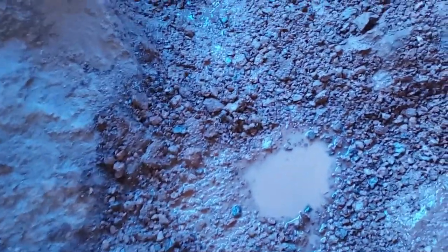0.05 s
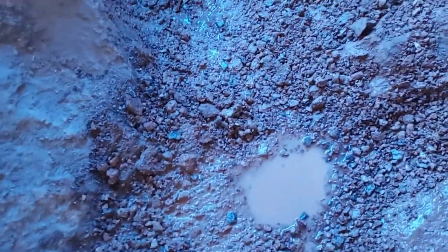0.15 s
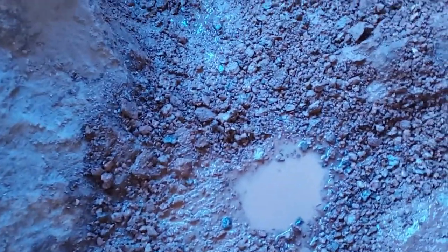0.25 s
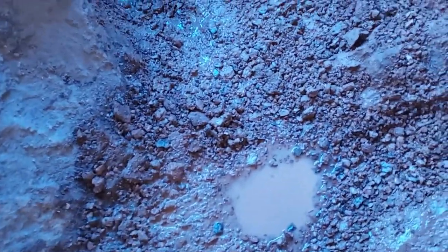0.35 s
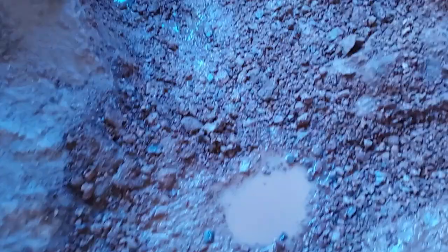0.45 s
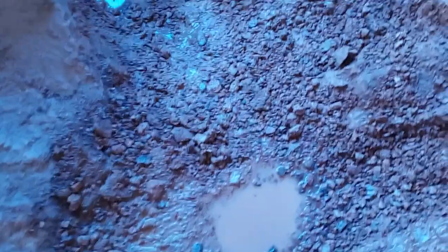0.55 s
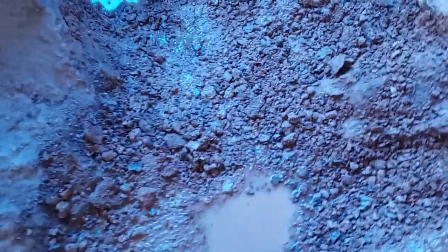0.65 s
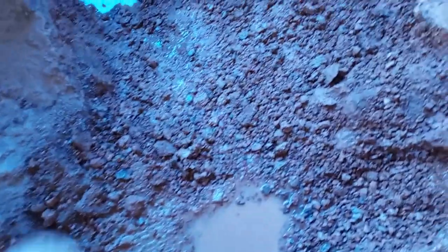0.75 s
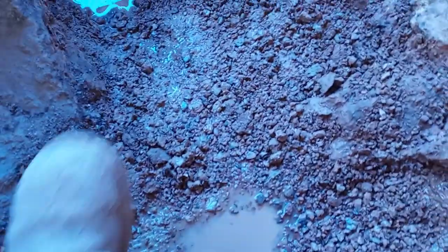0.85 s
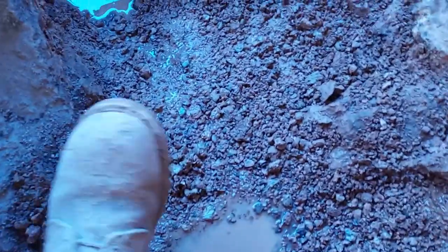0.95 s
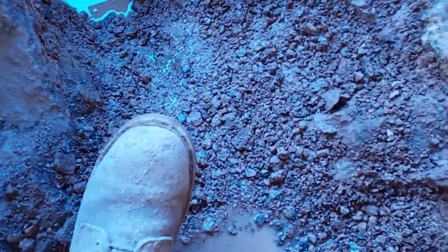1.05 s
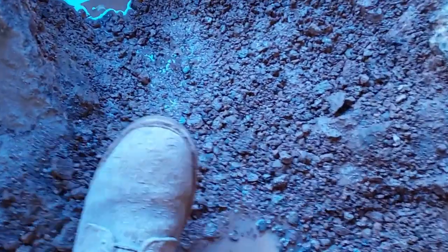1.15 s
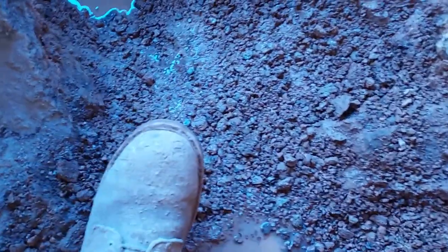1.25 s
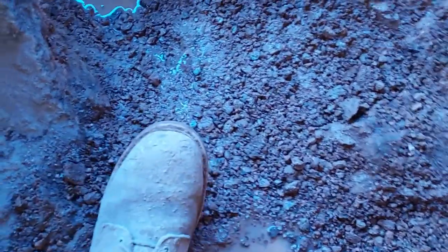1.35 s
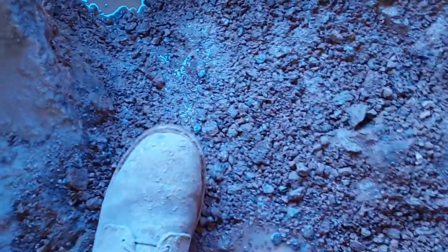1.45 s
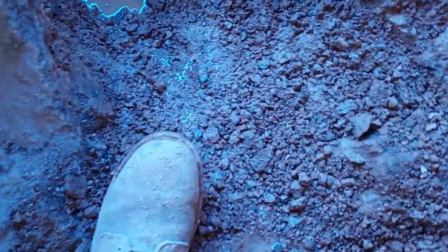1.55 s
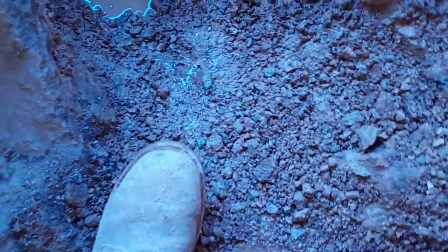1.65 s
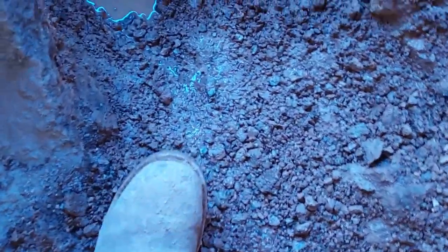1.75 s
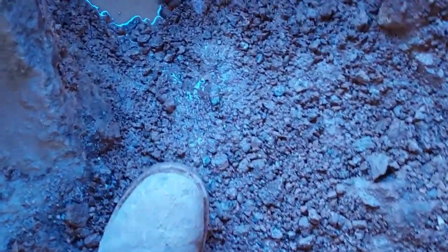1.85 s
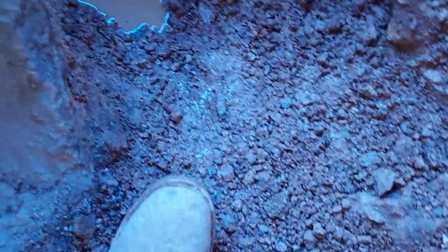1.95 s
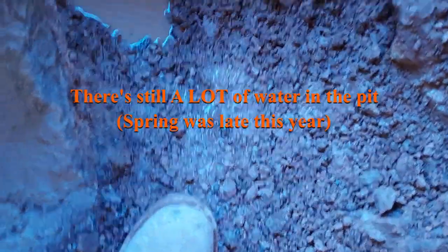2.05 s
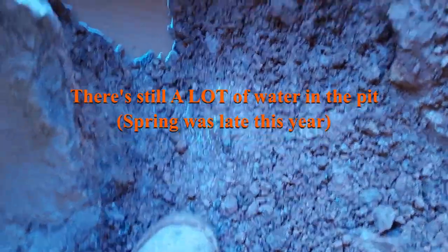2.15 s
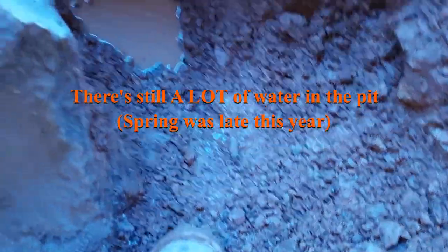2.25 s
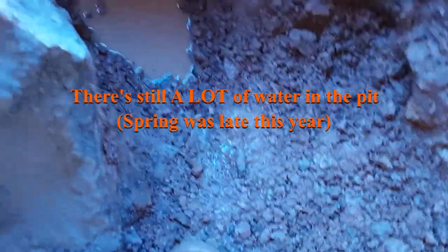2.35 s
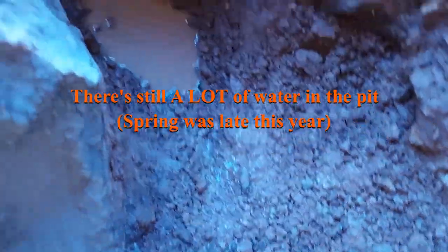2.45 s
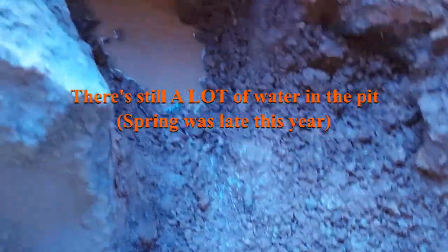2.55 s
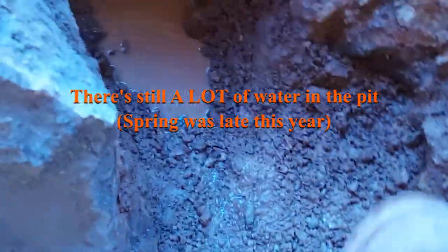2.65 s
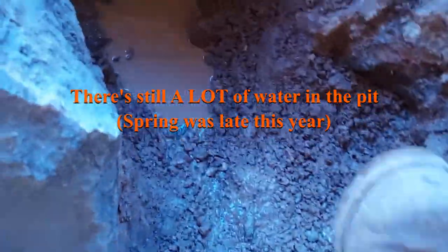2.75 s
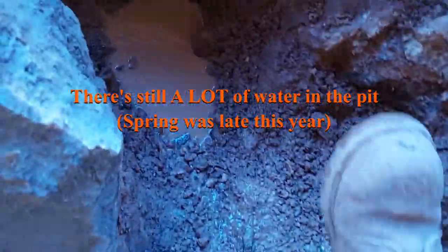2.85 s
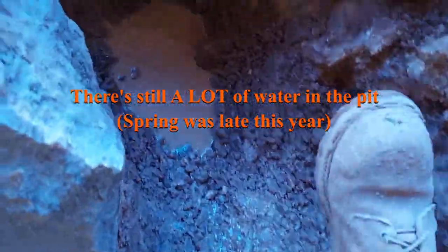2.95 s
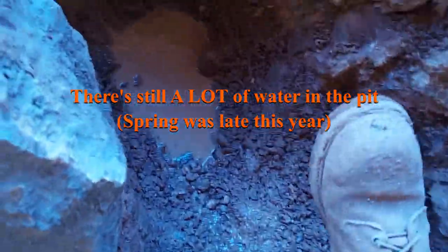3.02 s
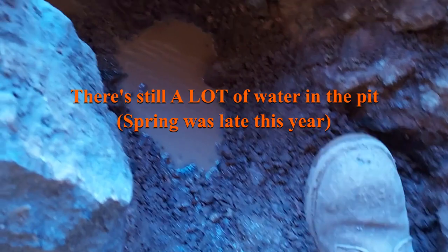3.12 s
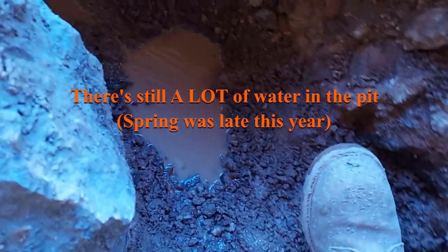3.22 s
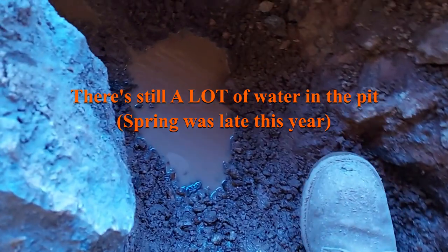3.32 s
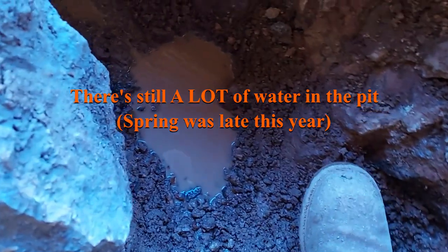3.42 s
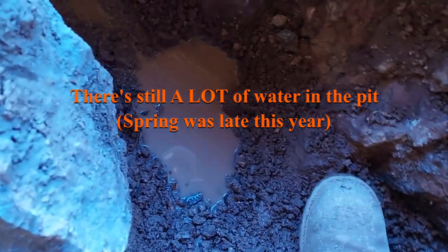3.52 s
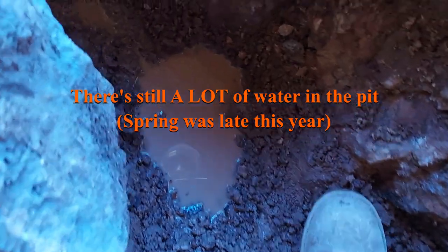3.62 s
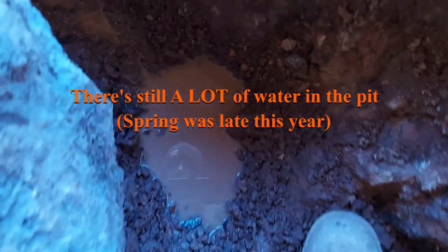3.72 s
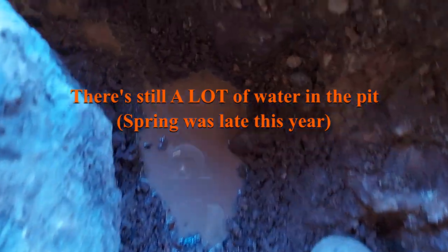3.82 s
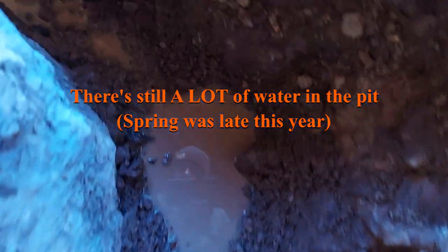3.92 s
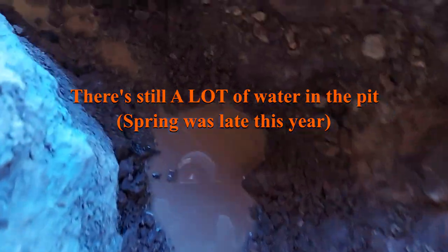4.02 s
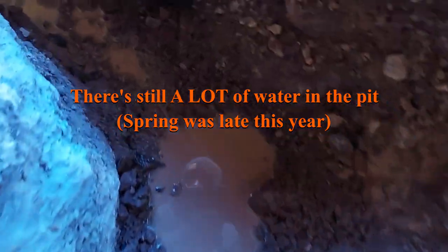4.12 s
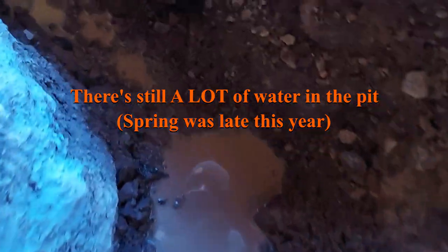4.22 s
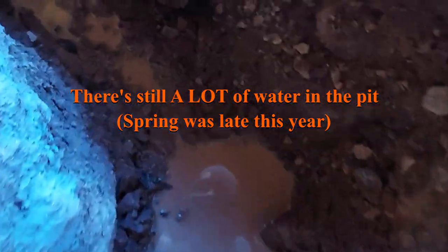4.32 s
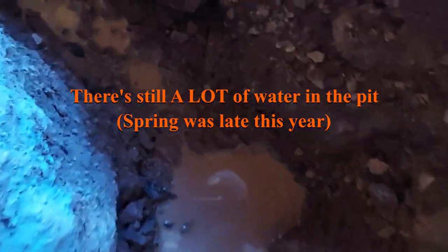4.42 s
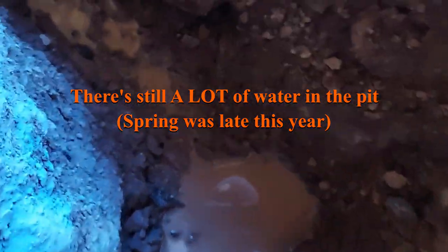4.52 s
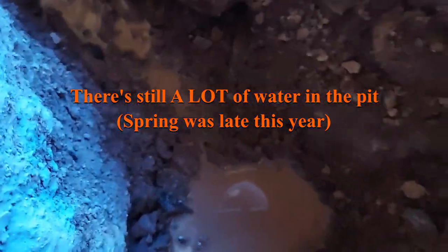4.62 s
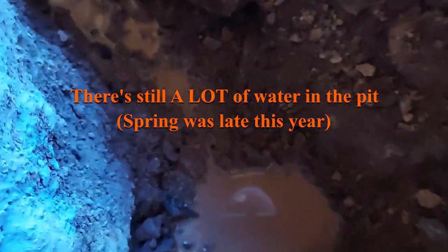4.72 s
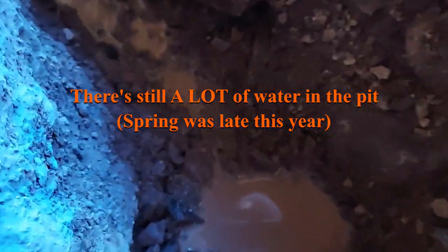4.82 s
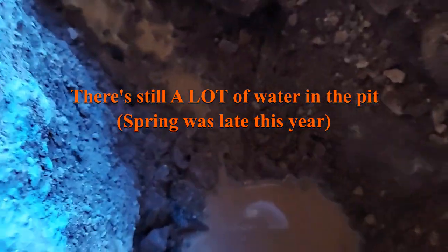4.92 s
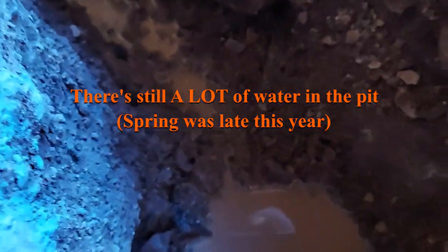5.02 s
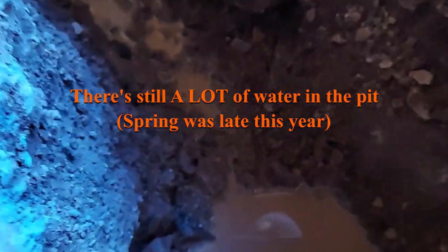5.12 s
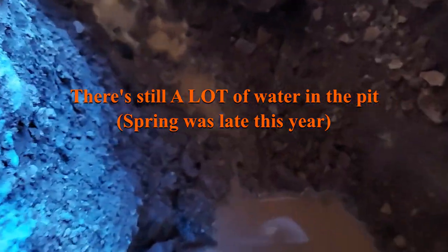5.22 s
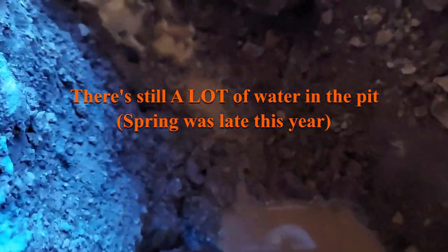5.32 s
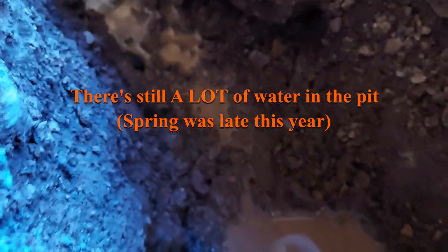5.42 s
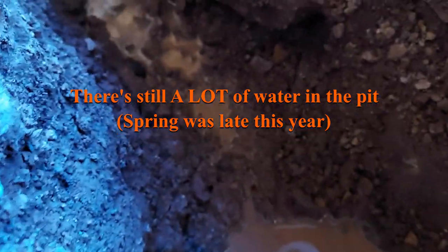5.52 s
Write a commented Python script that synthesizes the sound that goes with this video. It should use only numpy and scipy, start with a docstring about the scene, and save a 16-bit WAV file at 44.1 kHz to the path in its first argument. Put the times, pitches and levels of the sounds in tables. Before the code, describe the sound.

Boots crunch and shift on wet gravel in a narrow rock pit, with stones clacking sharply and a low boom beneath.

```python
"""A clack of stone and a crunch of wet gravel open the scene: boots shift at the bottom of a narrow rock pit.
Coarse, small and fine stones grind as dense damped rings over noise, and wet grit fizzes on top.
Single stones clack as pairs of short rings, grit bursts in bright puffs, and the close rock walls answer both.
Under it the ground thuds (low grains), the air of the pit booms and a faint air hiss stays (coloured noise).
All of it is heard through the two ports of a hand-held camera."""
import sys
import numpy as np
from scipy import signal
from scipy.fft import rfft, irfft, next_fast_len
from scipy.io import wavfile
from scipy.ndimage import uniform_filter1d, map_coordinates

SR = 44100
rng = np.random.default_rng(int(sys.argv[2]) if len(sys.argv) > 2 else 0)


def log_audio(samples):
    """Write samples as a 16-bit WAV file to the path given in sys.argv[1]."""
    # one column per channel
    frames = np.atleast_2d(samples).T
    # limit to full scale, then quantise
    limited = np.clip(frames, -1, 1)
    pcm = np.round(limited * 32767).astype(np.int16)
    wavfile.write(sys.argv[1], SR, pcm)


N = 245637

# The sole pressing into the gravel: start_s, hold_s, fall_s (time to die 20 dB, never under 0.02),
# small_db (small stones), then relative to small_db: coarse_db, fine_db, grit_db, thud_db
CRUNCH_EVENTS = [(0.021, 0, 0.11, -57, 2.5, -3, -3.5, 4.5), (0.26, 0.018, 0.3, -69.5, -1.5, 0, -4, 0),
                 (.372, 0, 0.42, -74.5, 9, 0, 0.5, 15), (0.535, 0.016, -0.07, -58, 5.5, -2, -24, 5),
                 (0.582, 0.0097, 0.1, -60, 2.5, 3.5, 4, 0.5), (0.776, 0.044, -0.05, -64, -3, -1, -3, 5),
                 (0.834, 0.062, -0.9, -70, 3.5, 0, -17, 9), (0.885, 0, 0.2, -73, -13, -1, 4, 10),
                 (1.062, 0.016, -0.05, -59, 5, 4, -1, 8), (1.125, 0.046, 0.05, -57, 2.5, 0.5, -2.5, 7),
                 (1.174, 0.064, 0.12, -51, -6.5, -10, -11, 2), (1.293, 0, 0.2, -60.5, -8, -1.5, -2.5, 1.5),
                 (1.509, 0.13, -0.8, -58, -7.5, -2, -4, -9.5), (1.663, 0, 0.13, -55, 2.5, -2, -2, -3),
                 (1.732, 0.082, 0.43, -66.5, 4, 1.5, -1, -18),
                 (2.007, 0.013, 0.09, -61.5, 4.5, -2.5, -4, 5),
                 (2.301, 0.077, -1.1, -68, 7.5, -6, -1.5, 8.5), (2.772, 0.019, 0.16, -57, 4.5, -5, 2, 1),
                 (2.938, 0, 0.5, -59, 0.5, -5.5, -7, 1), (3.26, 0.0007, 0.09, -53, 4, -7.5, -8.5, 1),
                 (3.358, 0.0042, 2.5, -63.5, 2, -19, -16, 1), (3.443, 0.083, 0.01, -52.5, -2, -5, -6, -20),
                 (3.597, 0.065, -0.15, -48.5, 3, -4.5, -4.5, -1.5),
                 (3.83, 0.058, -0.0573, -44, -6.5, -5, -7.5, -2.5),
                 (4.016, 0.016, 0.04, -49, 5.5, -6.5, -8, 6), (4.157, 0.031, 0.1046, -55, 0, -2.5, -8, 4),
                 (4.311, 0.0085, -0.4, -62, -1.5, -9, -20, 3.5), (4.5, 0.15, 0.5, -66, 4, -0.5, -3, 4.5),
                 (4.713, 0.076, -1.54, -64.5, -10, 0, 0, -5),
                 (5.138, 0.033, -0.1, -63.5, 0, -5.5, -10, 6.5), (5.35, 0, 0.23, -73.5, 4.5, -4, -14, 13.5)]
RISE_S = 0.057  # a crunch grows 20 dB in this time
# The boots shuffling between the crunches: time_s, small_db (small stones)
SHUFFLE_LEVEL = [(0, -79), (.3, -77.5), (1, -76.5), (1.45, -71), (1.9, -73.5), (2.15, -69), (2.45, -62.5),
                 (2.72, -61), (3.1, -68), (3.35, -65), (3.72, -52.5), (3.96, -51), (4.12, -58.5),
                 (4.4, -69.5), (4.95, -69), (5.35, -74), (5.57, -97)]
# Shuffle layers relative to that curve: one level_db each for small, coarse, fine, grit, thud
SHUFFLE_BALANCE_DB = [-1, -2.5, -4.5, -4.5, -3.5]

# Colour of each gravel layer: freq_hz, relative_db
COARSE_COLOUR = [(250, -4), (480, -3.5), (700, -8.5), (1050, -5), (1350, -5.5), (2200, -41)]
SMALL_COLOUR = [(1000, -3), (1450, -3.5), (1700, -0.5), (2100, -3), (2800, -6), (3200, -8.5), (4200, -35)]
FINE_COLOUR = [(2500, -8), (3300, -0.5), (4200, 0.5), (5100, 0), (6000, -2.5), (7500, -26)]
GRIT_COLOUR = [(5000, -8), (6500, 2.5), (8500, -1), (11000, 3), (14800, 2.5), (16000, 1.5)]
# Modes of the pit that ring in the grinding: freq_hz, width_hz, gain_db
PIT_MODES = [(684, 42, -2), (1011, 33, -5.5), (1680, 41, -1.5), (2740, 55, -8.5), (3710, 40, -16),
             (5060, 146, -9)]

# Two stones knocking: start_s, level_db (before a common trim), pitch_hz, other_pitch_hz,
# other_db (relative), ring_ms (to fall to 1/e), chip_db and knock_db (relative, before a boost), left_right_db
CLACK_EVENTS = [(0.024, -38.5, 705, 2020, -3.5, 3.5, -26, -10, 14),
                (.036, -46, 710, 1910, 2, 3.5, -24, -8, 20), (0.085, -34, 1060, 1900, -8, 1.8, -39, -23, 2),
                (0.359, -37, 690, 2220, -11, 4.3, -18, -0.5, 9),
                (0.4949, -45.5, 720, 960, -2, 5.1, -30, 4, 4), (0.524, -46.5, 745, 410, 4, 7, -5.5, -17, 7),
                (0.54, -36.5, 694, 1030, -5.5, 5.3, -9, -3, 6),
                (0.804, -37.5, 900, 760, -7, 3.1, -3.5, -19, 2.5),
                (0.831, -40, 990, 1510, -12, 2.9, -12, -27, 3),
                (1.038, -25.5, 990, 2706, 1, 5.4, -2, -7, 6.5),
                (1.0397, -32.5, 497, 1690, -10, 6.7, -6, -10, 7),
                (1.131, -39.5, 2960, 3800, 1, 2.8, -8, -12, 3),
                (1.152, -39, 2850, 6530, -11, 4.6, -9, -2, 14),
                (1.172, -38, 290, 470, -4, 9.7, -40, -16, 5),
                (1.205, -35.5, 247, 520, -2, 5.6, -40, -17, 6),
                (1.577, -39, 1230, 2430, 1, 2.4, -17, -16, 12.5),
                (1.66, -42.5, 1460, 3470, -7, 4.6, -7, -18.5, 5),
                (1.703, -40, 600, 990, -10, 3.4, -23, -2, 13), (2.021, -46, 613, 1050, -12, 3.5, -7, 7, 6),
                (2.222, -35, 1115, 2210, -3.5, 3.5, -21, -8, 8.5),
                (2.3, -35, 1280, 2280, -6, 2.7, -26, -11, 11), (2.308, -46, 1300, 2310, 0, 2.3, -20, 3, 11),
                (2.3445, -33.5, 1460, 810, -4.5, 2, -26, -9, 10),
                (2.47, -34, 1280, 1880, -3.5, 2.9, -42, -31, 15),
                (2.5166, -26.5, 1150, 2200, -7, 2.27, -20.5, -23, 10.5),
                (2.576, -42.5, 2150, 3200, -7, 4.1, -3.5, -34.5, 10),
                (2.705, -41, 640, 1120, -6, 3.1, -13.5, -19.5, 15),
                (2.745, -38.5, 1140, 1740, 1.5, 3.8, -30, -1, 2),
                (2.776, -36.5, 545, 900, -22, 4.9, -42, -33, 8),
                (2.917, -35, 1030, 1680, -4, 3.1, -21, -8, 12),
                (3.061, -41.5, 1060, 1980, 0.5, 2.7, -3, -23, 13),
                (3.244, -32, 698, 1530, 1.5, 4, -14, -2, 4.5),
                (3.5355, -25, 1830, 690, -6.5, 3.9, -23, -31, 12),
                (3.579, -37, 1140, 594, 2, 4, -12, -18, 9),
                (3.608, -34.5, 670, 3150, -4.5, 4.3, -19, -21, 14),
                (3.623, -33, 825, 1150, 4, 2.4, -19, -1, 1), (3.637, -44, 4950, 2640, 3, 4.6, -23, -25, 12),
                (3.652, -36.5, 640, 2640, 4, 5, -14, -20, 8),
                (3.663, -37.5, 4920, 3430, -3, 3.6, -25, -25, 8),
                (3.817, -43.5, 2480, 3430, 2, 4.9, 0.5, -25, 8),
                (3.868, -26, 1690, 2410, -21, 5.1, -21, -6, 9.5),
                (3.995, -31, 210, 297, -8, 6.6, -45, -13, 1),
                (4.008, -31.5, 350, 1125, -8.5, 12, -32, -13, 2),
                (4.036, -30.5, 960, 1780, 1, 3, -16, -13, 11),
                (4.149, -26, 640, 1270, -4, 2.85, -26, -21, 14.5),
                (4.187, -43.5, 1810, 5150, 0, 4.2, -1, -23, 11),
                (4.536, -32, 840, 1820, -10, 3, -21, -7.5, 8.5),
                (4.597, -35.5, 966, 720, -5, 6.6, -13, -5, 5),
                (4.716, -37, 935, 714, -13, 5.9, -32, -16, 7),
                (4.755, -40.5, 756, 1060, -3, 4.2, -34, -10, 5),
                (5.348, -42.5, 745, 470, 2, 3.8, -40, 0, 12)]
# Modes of one stone: pitch_ratio, level_db
STONE_MODES = [(1, -0.5), (1.319, -12.5)]
# The edges that touch ring high, whatever the stone's size: freq_hz, relative_db
CHIP_MODES = [(1600, -8), (1950, -8.5), (2300, -3.5), (2600, -8), (2950, -2), (3300, -2), (3750, -6.5),
              (4250, -10.5), (4800, -13.5), (5500, -11)]
CONTACT_CYCLES = 0.42  # a stone takes about this much of its period to be set ringing

# Grains of grit bursting: start_s, level_db (before a common trim)
CRACK_EVENTS = [(0.243, -53), (0.2567, -51), (0.3589, -47.5), (0.524, -48), (0.582, -37), (.6, -35),
                (0.77, -47), (0.874, -46), (0.883, -47), (1.038, -26), (1.107, -49), (1.1138, -39.5),
                (1.1458, -37), (2.704, -40.5), (2.7417, -47), (2.784, -45), (3.0534, -40), (3.06, -35),
                (3.245, -45.5), (3.5365, -41), (3.5623, -39), (3.6077, -35), (3.8162, -38), (3.87, -34),
                (4.142, -36.5), (4.187, -40), (4.582, -46.5), (4.6685, -47), (4.776, -54)]
CRACK_LEFT_DB = 7  # left over right

# Colour of the loaded ground: freq_hz, relative_db
THUD_COLOUR = [(120, -77), (190, -1.5), (300, -4), (480, -7), (800, -22)]
# Colour of the booming air of the pit: freq_hz, relative_db
BOOM_COLOUR = [(30, -20.5), (73, -3), (102, 4), (124, 4.5), (167, -9.5), (220, -13), (290, -13),
               (480, -120)]
# Swells of the boom: time_s, level_db
BOOM_SWELLS = [(0.0, -69.5), (0.22, -53.5), (0.29, -76), (0.37, -56), (0.46, -66), (0.6, -55), (0.7, -67.5),
               (0.76, -58.5), (0.99, -68), (1.05, -51.5), (1.12, -60), (1.19, -47), (1.5, -65),
               (1.64, -54.5), (1.89, -69.5), (2.02, -57.5), (2.17, -65.5), (2.42, -49.5), (2.59, -59),
               (2.78, -51), (2.82, -59), (2.87, -50.5), (3.5, -58), (3.65, -43), (3.72, -51.5),
               (4.0, -40.5), (4.06, -51.5), (4.42, -56.5), (4.48, -47.5), (4.89, -52.5), (4.92, -60),
               (5.1, -56), (5.18, -48.5), (5.27, -55.5), (5.37, -49.5), (5.57, -53)]
# How long the rock walls ring: freq_hz, t60_s
WALL_DECAY = [(150, 0.083), (1000, 0.25), (4000, 0.12), (12000, 0.007)]
# Colour of the still air and hiss: freq_hz, relative_db
AIR_COLOUR = [(100, -56), (300, -25), (900, -23), (2000, -35), (4400, -10), (9000, -14), (16000, -15)]

# Likeness of the two ports: freq_hz, correlation (0 to 1)
PORT_LIKENESS = [(60, 0.98), (130, 0.83), (290, 0.87), (640, 0.27), (1100, 0.096), (1800, 0.19),
                 (4500, 0.014), (8000, 0.92), (15000, 1)]
# The left port is more open: freq_hz, left_right_db
PORT_BALANCE = [(60, 0.5), (110, 5), (200, 3.5), (380, 5.5), (700, 9.5), (1290, 5), (2380, 6.5),
                (4400, 3.5), (8120, 4), (15000, 3.5)]
# The left port leads: freq_hz, phase_rad
PORT_LEAD = [(60, 1.2), (125, 0.08), (230, 0.59), (600, 0.32), (1050, 0.9), (1500, 2.03), (3000, 4.38),
             (6500, 5.38)]
HALF_EACH = np.array([[.5], [-.5]])  # shares a left-right difference between the ports
LOW_HZ, TOP_HZ = 30, 15900  # bass cut (half amplitude) and band limit


def tread():
    """Under the sole coarse, small and fine stones grind in lumps as it slips in jerks, and wet grit fizzes."""
    small_db, coarse_db, fine_db, grit_db, _ = effort()
    slip = sole_slip()
    noise = rng.standard_normal((4, 2, N))  # contacts too dense to tell apart
    lumps = grains(count=4000, centre_hz=800, spread=.45, cycles=3, spiky_db=3, size=400)
    pebbles = grains(count=9000, centre_hz=2600, spread=.35, cycles=4, spiky_db=2.5, size=150)
    sand = grains(count=20000, centre_hz=9000, spread=.45, cycles=1.5, spiky_db=2.2, size=32)
    chips = grains(count=12000, centre_hz=4500, spread=.3, cycles=2.5, spiky_db=2.5, size=80)

    # every layer follows the slip to its own depth in dB
    coarse = amp(coarse_db + 1.9 * slip) * stereo(lumps + .6 * noise[0], COARSE_COLOUR)
    small = amp(small_db + 1.97 * slip) * stereo(pebbles + .7 * noise[1], SMALL_COLOUR)
    fine = amp(fine_db + 2.8 * slip) * stereo(chips + .6 * noise[3], FINE_COLOUR)
    fizz = patchy(stereo(sand + .6 * noise[2], GRIT_COLOUR), depth_db=2.5)
    grind = filtered(coarse + patchy(small + fine, depth_db=1.64), pit_modes)
    return grind + amp(grit_db + 1.2 * slip) * fizz


def effort():
    """Levels in dB of small, coarse, fine, grit and thud: each crunch rises, holds and dies over the shuffle."""
    t = np.arange(0, N, 32) / SR  # a control point every 32 samples
    shuffle_db, = curves(SHUFFLE_LEVEL)
    power = amp(2 * (shuffle_db[::32] + np.array(SHUFFLE_BALANCE_DB)[:, None]))
    for start_s, hold_s, fall_s, small_db, *over_db in CRUNCH_EVENTS:
        rise = (start_s - t) / RISE_S
        fall = (t - start_s - hold_s) / max(fall_s, .02)
        shape_db = -20 * np.maximum(np.maximum(rise, fall), 0)
        power = power + amp(2 * (small_db + shape_db + np.array([0, *over_db])[:, None]))
    return [np.interp(np.arange(N) / SR, t, row) for row in 10 * np.log10(power)]


def sole_slip():
    """The sole slips in jerks, sudden then dying, over a slow drift; stones of all sizes feel it."""
    jolts = (rng.random(N) < 70 / SR) * rng.exponential(size=N)  # about 70 a second
    jerks = signal.lfilter([1], [1, -np.exp(-1 / (SR * .009))], jolts)  # each dies to 1/e in 9 ms
    return .5 * wobble(30) + .75 * np.minimum(unit(jerks - jerks.mean()), 2)


def pit_modes(hz):
    """The pit's modes add resonant peaks to the straight sound."""
    response = 1
    for centre, width, db in PIT_MODES:
        damping = 1j * hz * width
        response = response + amp(db) * damping / (centre * centre - hz * hz + damping)
    return response


def clacks():
    """Both stones ring for a few cycles at their own pitches, with a chip and a dull knock of the ground."""
    out, t = np.zeros((2, N + SR)), np.arange(SR // 20) / SR
    for start_s, db, hz, other_hz, other_db, ring_ms, chip_db, knock_db, pan_db in CLACK_EVENTS:
        grip = np.exp(-(1000 * t / ring_ms) ** 1.77)  # the wet bed grips the stones and stops their ring
        ring = grip * (stone(hz, t) + amp(other_db) * stone(other_hz, t))
        chip = amp(chip_db + 9 - 60 * t / 0.008) * chipped_edges(t)  # dies 60 dB in 8 ms
        knock = amp(knock_db + 4 - 60 * t / 0.028) * stone(320 * rng.normal(1, 0.13), t)  # 60 dB in 28 ms
        gain = amp(db - 3.5 + pan_db * HALF_EACH)
        out[:, round(start_s * SR):][:, :len(t)] -= gain * (ring + chip + knock)
    return out[:, :N]


def stone(hz, t):
    """A struck stone's modes, eased in by a contact that lasts a share of its period."""
    modes = 0
    for ratio, db in STONE_MODES:
        phase = rng.random() * (ratio > 1.1)  # only the upper mode starts anywhere in its cycle
        modes = modes + amp(db) * np.sin(2 * np.pi * (hz * ratio * t + phase))
    return (1 - np.exp(-(t * hz / CONTACT_CYCLES) ** 2)) * modes


def chipped_edges(t):
    """The touching edges ring at high pitches, each slightly detuned, with a very quick onset."""
    ring = 0
    for edge_hz, db in CHIP_MODES:
        detuned_hz = edge_hz * rng.normal(1, .03)
        ring = ring + amp(db) * np.sin(2 * np.pi * (detuned_hz * t + rng.normal(0, 0.19)))
    return (1 - np.exp(-t / .0001)) * ring


def cracks():
    """Each bursting grain is a short bright puff of noise, partly unlike at the two ports."""
    out, t = np.zeros((2, N + SR)), np.arange(SR // 20) / SR
    for start_s, db in CRACK_EVENTS:
        grit = signal.lfilter([1, -.6, -.4], 1, rng.standard_normal((2, len(t))))  # thins the bass
        puff = amp(-12 - 60 * t / 0.019) * (grit[0] + 0.63 * grit)  # dies 60 dB in 19 ms
        out[:, round(start_s * SR):][:, :len(t)] += amp(db + CRACK_LEFT_DB * HALF_EACH) * puff
    return out[:, :N]


def ground():
    """The loaded ground thuds as large stones settle: low grains in noise that follow the effort."""
    thud_db = effort()[-1]
    settling = grains(count=900, centre_hz=283.3, spread=0.323, cycles=2.53, spiky_db=2.5, size=900)
    rumble = stereo(settling + 2.1 * rng.standard_normal((2, N)), THUD_COLOUR)
    return amp(thud_db + 0.45 * wobble(21.97)) * rumble


def boom():
    """The air of the pit booms: low noise around the pit's pitches, swelling on its own level curve."""
    boom_db, = curves(BOOM_SWELLS)
    return amp(boom_db) * stereo(rng.standard_normal((2, N)), BOOM_COLOUR)


def walls(x):
    """The rock walls answer; each frequency dies at its own speed, with a new tail every quarter second."""
    out, step = np.zeros((2, N + SR)), SR // 4
    for start in range(0, N, step):
        hz, t, z = signal.stft(rng.standard_normal((2, SR // 3)), SR, nperseg=256)
        decay = amp(-60 * t / along(WALL_DECAY, hz)[:, None])
        tail = signal.istft(z * decay, SR, nperseg=256)[1]
        wet = signal.fftconvolve(x[None, start:start + step], tail / np.linalg.norm(tail[0]), axes=1)
        out[:, start + 60:][:, :wet.shape[1]] += wet  # the answer comes 60 samples late
    return out[:, :N]


def still_air():
    """The still air and hiss behind everything: steady coloured noise."""
    return amp(-80.5) * stereo(rng.standard_normal((2, N)), AIR_COLOUR)


def grains(count, centre_hz, spread, cycles, spiky_db, size):
    """Two streams of small contacts, each a damped ring of random pitch; a few are much larger."""
    out, t = np.zeros((2, N + size)), np.arange(size) / SR
    for side in out:
        when, big = rng.random((2, count))
        hz = np.clip(centre_hz * np.exp(spread * rng.standard_normal(count)), 100, 16000)[:, None]
        strength = amp(np.minimum(-np.log(big), 5) * spiky_db)[:, None]
        strength = strength * np.sqrt(hz)  # equal energy for short and long rings
        ring = strength * np.sin(2 * np.pi * hz * t) * np.exp(-hz * t / cycles)
        index = (when * N).astype(int)[:, None] + np.arange(size)
        side += np.bincount(index.ravel(), ring.ravel(), N + size)
    return unit(out[:, :N])


def patchy(x, depth_db):
    """The sound comes and goes in patches of pitch and time, partly unlike at the two ports."""
    z = signal.stft(x, nperseg=512)[2]
    field = rng.standard_normal((3, *z.shape[1:]))
    field = uniform_filter1d(field, size=8, axis=1)  # patches 8 bins tall
    field = uniform_filter1d(field, size=5, axis=2)  # and 5 frames long
    gain = amp(depth_db * unit(field[0] + field[1:]))  # one shared field, one for each port
    return signal.istft(z * unit(gain), nperseg=512)[1][:, :N]


def stereo(pair, colour):
    """Two unrelated signals coloured and mixed to the likeness of the two ports, rms 1."""
    def mid_side(hz):
        turn = np.arccos(np.clip(along(PORT_LIKENESS, hz), -1, 1)) / 2
        return amp(along(colour, hz)) * [np.cos(turn), np.sin(turn)]

    mid, side = filtered(pair, mid_side)
    return unit(np.array([mid + side, mid - side]))


def filtered(x, response):
    """x times a response of frequency."""
    m = next_fast_len(N + SR // 2)
    return irfft(rfft(x, m) * response(np.fft.rfftfreq(m, 1 / SR)), m)[..., :N]


def along(points, hz):
    """Reads a (freq_hz, value) table at any frequency, on a log axis."""
    f, v = np.transpose(points)
    return np.interp(np.log(hz + 1), np.log(f + 1), v)


def curves(rows):
    """One value per sample for each column after the time."""
    s, *cols = np.transpose(rows)
    return [np.interp(np.arange(N) / SR, s, c) for c in cols]


def wobble(rate):
    """A smooth random curve, rate knots a second."""
    knots = rng.standard_normal(int(N * rate / SR) + 4)
    return map_coordinates(knots, [np.arange(N) * rate / SR])


def unit(x):
    """x at rms 1."""
    return x / np.sqrt(np.mean(x ** 2) + 1e-20)


def amp(db):
    """Gain of a level in dB."""
    return 10 ** (np.asarray(db) / 20)


def scene():
    """The pit at the two ports: single stones carry their own panning, the rest takes the port balance."""
    stones = clacks() + cracks()
    echo = amp(-12) * walls(stones.mean(axis=0))
    bed = tread() + ground() + boom() + echo + still_air()

    def balance(hz):
        return amp(along(PORT_BALANCE, hz) * HALF_EACH)

    def lead(hz):
        return np.exp(1j * along(PORT_LEAD, hz) * HALF_EACH)

    return filtered(stones, lead) + filtered(bed, lambda hz: balance(hz) * lead(hz))


def record(dry):
    """The camera cuts the deepest bass and keeps nothing above its band limit."""
    return filtered(dry, lambda hz: (hz < TOP_HZ) / (1 + (LOW_HZ / (hz + 1)) ** 4))


dry = scene()
out = record(dry)
log_audio(out)
```